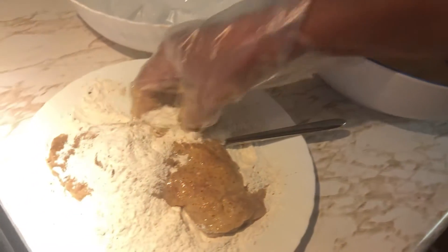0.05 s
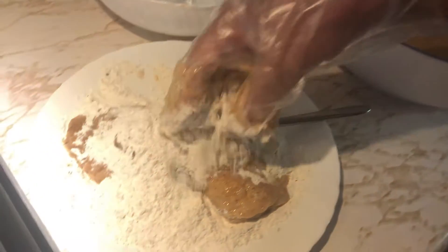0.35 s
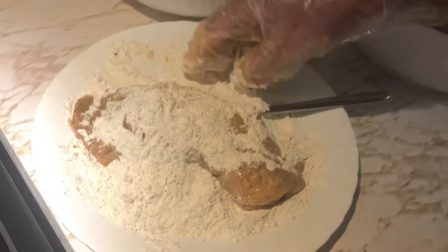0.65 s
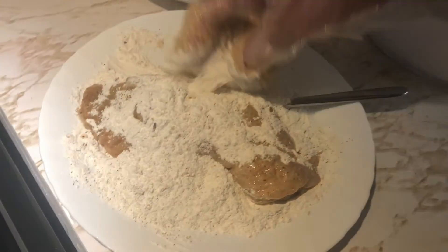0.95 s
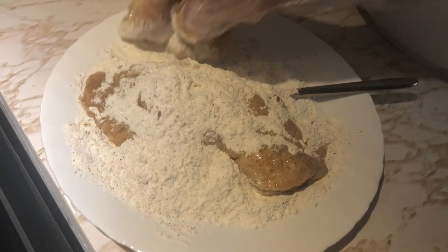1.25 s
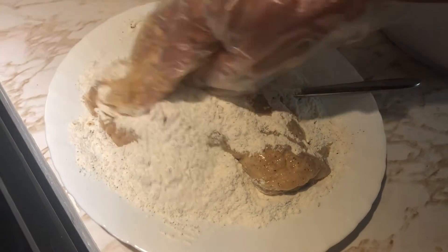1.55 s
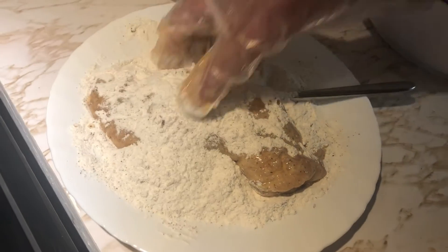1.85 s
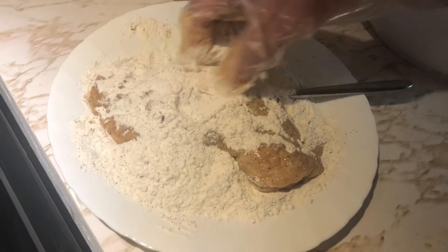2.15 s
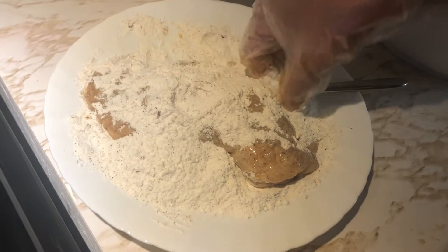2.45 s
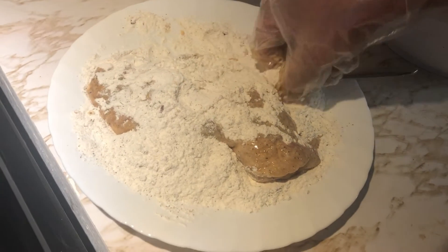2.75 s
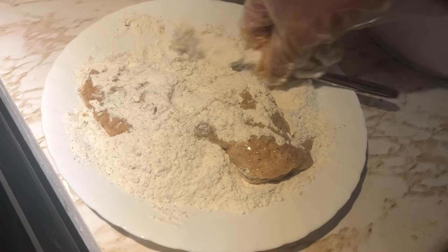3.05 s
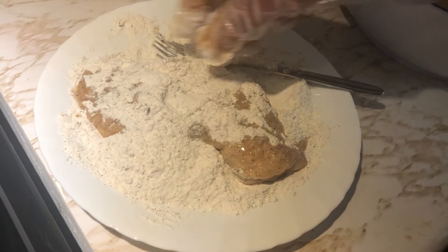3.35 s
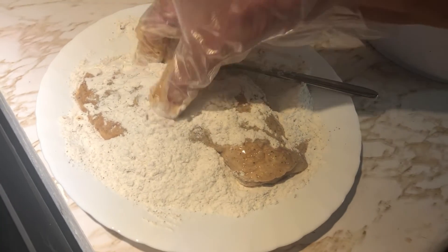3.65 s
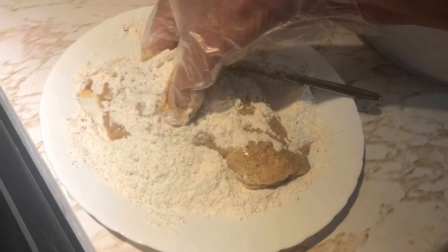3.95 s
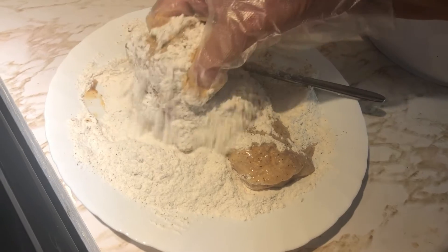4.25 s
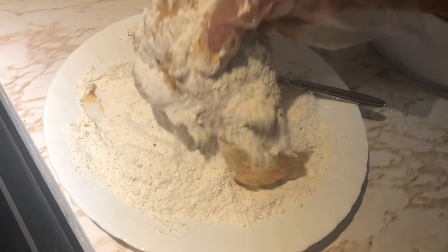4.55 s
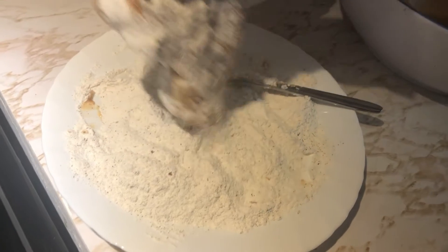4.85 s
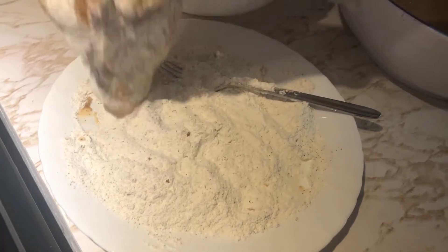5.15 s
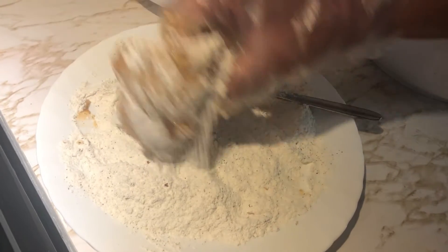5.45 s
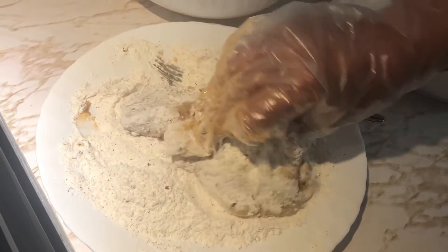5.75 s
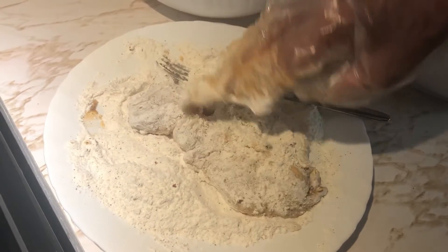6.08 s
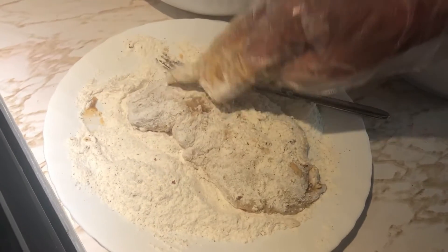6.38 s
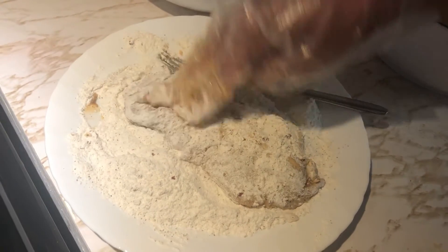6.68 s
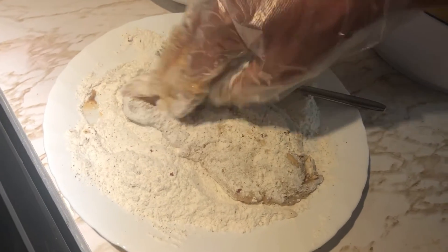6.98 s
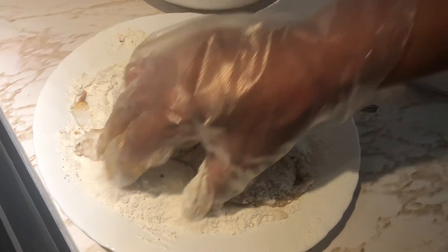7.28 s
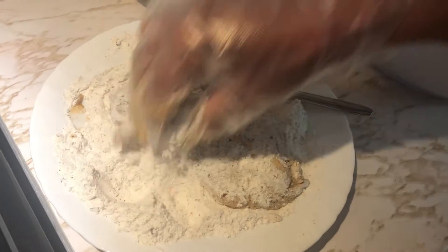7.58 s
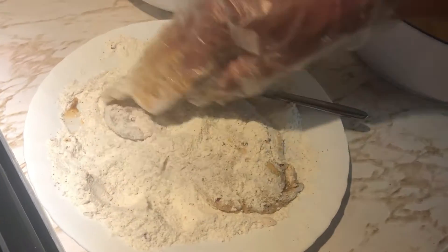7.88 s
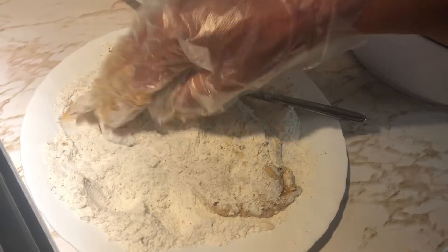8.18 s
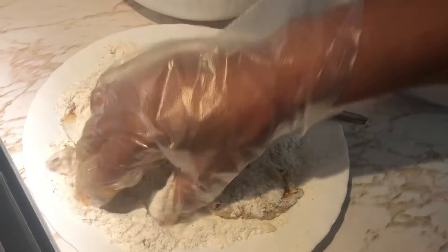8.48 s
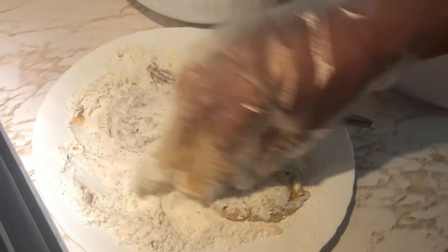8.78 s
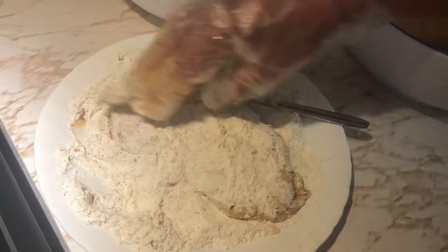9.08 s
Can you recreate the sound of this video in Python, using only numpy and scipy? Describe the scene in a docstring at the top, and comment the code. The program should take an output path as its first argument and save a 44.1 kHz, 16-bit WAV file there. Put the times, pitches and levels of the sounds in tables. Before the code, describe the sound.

Soft, crisp crinkling from a plastic glove comes and goes over the faint hiss of flour rubbed on a plate. A third of the way through, a fork drops against the china with one sharp, ringing clack, by far the loudest sound. The hand keeps working, and wet chicken now and then smacks lightly as it unsticks from the glove. A low appliance hum fills the small kitchen throughout.

```python
"""A hand in a thin plastic glove scoops and presses flour over chicken on a china plate.
The glove crinkles as tiny creases buckle and bigger folds snap. The powder rubs with a soft hiss,
and the wet meat smacks now and then as it lets go of the glove. Once a fork slips on the rim and
clacks down, setting steel and china ringing. An appliance hums in the small, echoing kitchen."""
import sys
import numpy as np
from scipy import signal
from scipy.fft import rfft, irfft, next_fast_len
from scipy.io import wavfile
from scipy.ndimage import uniform_filter1d

SR = 44100
rng = np.random.default_rng(int(sys.argv[2]) if len(sys.argv) > 2 else 0)


def output_pcm(signal):
    """Save a mono or channel-first signal as 16-bit PCM at the path in sys.argv[1].

    Samples are clipped to [-1, 1] before scaling.
    """
    pcm = np.clip(np.atleast_2d(signal).T, -1, 1) * 32767
    wavfile.write(sys.argv[1], SR, np.round(pcm).astype(np.int16))


N = 402191


def from_db(db):
    """Turn decibels into a number to multiply a sound by."""
    return 10 ** (np.asarray(db) / 20)


def rms_one(x):
    """Scale a signal so its average strength (rms) is 1."""
    return x / np.sqrt(np.mean(x ** 2) + 1e-20)


def at_hz(points, hz):
    """Look up a value by pitch, blending between the rows of a table."""
    known_hz, values = np.transpose(points)
    return np.interp(np.log(np.maximum(hz, 1)), np.log(known_hz), values)


def noise(spectrum):
    """Steady noise of strength 1, shaped by rows of pitch_hz, level_db."""
    size = next_fast_len(N)
    gain = from_db(at_hz(spectrum, np.fft.rfftfreq(size, 1 / SR)))
    return rms_one(irfft(rfft(rng.standard_normal(size)) * gain, size)[:N])


def drift(turns_per_s):
    """A random wandering curve of strength 1."""
    place = np.arange(N) / SR * turns_per_s
    return rms_one(np.interp(place, np.arange(N), rng.standard_normal(N)))


def band(x, hz, octaves, order=2):
    """Keep the part of a sound around one pitch."""
    edges = [hz / 2 ** (octaves / 2), min(hz * 2 ** (octaves / 2), .47 * SR)]
    return signal.sosfilt(signal.butter(order, edges, "band", fs=SR, output="sos"), x + 1e-18)


def dying(fade_s):
    """Half a second of times, and a fade that drops 60 dB in fade_s."""
    t = np.arange(SR // 2) / SR
    return t, from_db(-60 * t / fade_s)


def ring(clicks, hz, cycles):
    """Each click rings at one pitch and drops 60 dB in the given number of cycles."""
    decay, angle = from_db(-60 * hz / (cycles * SR)), 2 * np.pi * hz / SR
    return signal.lfilter([1, 0, -1], [1, -2 * decay * np.cos(angle), decay * decay], clicks + 1e-18)


def add(track, start_s, sound):
    """Mix a sound in at a given time."""
    start = max(round(start_s * SR), 0)
    track[start:start + len(sound)] += sound[:N - start]


def room_air():
    """The air in the room makes a faint, low rush."""
    # tone of the air: pitch_hz, relative_db
    air_tone = [(20, -22.5), (42, 5), (80, 0), (115, 8.5), (170, -1), (240, 3), (400, -3), (500, -5),
                (700, -4.5), (1100, -3.5), (2500, -18.5), (6000, -28), (10000, -43.5), (16000, -28.5)]
    return from_db(-55.5) * noise(air_tone)


def appliance_hum(waver_db_per_radian):
    """Motors and mains power hum; the less steady a tone is, the more its level wavers too."""
    # tones of the hum: pitch_hz, level_db, wander_radians
    tones = [(49.8, -66, .3), (57.7, -62, 1.1), (71.3, -64.5, 1.2), (98, -67.5, 0.44), (147.8, -51.5, 0.13),
             (235.5, -69, 1.06), (310, -75, 0.22), (547, -79.5, .4)]
    t, out = np.arange(N) / SR, 0
    for hz, db, wander in tones:
        phase = 2 * np.pi * (hz * t + rng.random()) + wander * drift(4)
        gain = from_db(db + waver_db_per_radian * wander * drift(5))
        out = out + np.sqrt(2) * gain * np.sin(phase)
    return out


def kitchen_echo(x):
    """Reflections off the walls build up in a few milliseconds and die away, the highest ones first."""
    # echo of the kitchen: pitch_hz, fade_s, relative_db
    room = [(150, 0.46, 7.5), (500, 0.46, 1), (1790, 0.4, 3), (4200, 0.49, -3.5), (6500, 0.43, -9),
            (10000, 0.33, -8.5), (15000, 0.35, -3.5)]
    echo, room = 0, np.array(room)
    for hz in 90 * 2 ** np.arange(0, 8, .5):
        t, fade = dying(at_hz(room[:, [0, 1]], hz))
        gain = from_db(at_hz(room[:, [0, 2]], hz))
        echo = echo + gain * fade * band(rng.standard_normal(len(t)), hz, 0.52)
    echo = echo * (1 - np.exp(-t / 0.0054))
    return signal.fftconvolve(x, echo / np.sqrt(np.sum(echo ** 2)))[:N]


def dull_swells():
    """One long, faint swell of mid-pitched rush, among short, dull swells."""
    # swells of noise: middle_s, level_db, pitch_hz, rise_s, width_octaves
    swells = [(0.568, -57, 268, 0.065, 0.84), (1.35, -64.5, 820, .7, 0.86), (1.618, -61.5, 230, .15, 0.45),
              (3.578, -57, 580, 0.034, 0.24), (5.739, -63, 621, .08, 0.36), (5.979, -61.5, 607, 0.15, 0.39)]
    out = np.zeros(N)
    for middle_s, db, hz, rise_s, octaves in swells:
        swell = np.hanning(int(2 * rise_s * SR))
        body = band(rng.standard_normal(N // 2), hz, octaves)[-len(swell):]
        add(out, middle_s - rise_s, from_db(db) * rms_one(body * swell))
    return out


def worktop_thuds():
    """The fork's blow passes into the heavy plate and worktop, which answer with a few slow swings."""
    # low thuds: start_s, level_db, pitch_hz, rise_s
    thuds = [(3.0655, -14, 557, 0.0015), (3.067, -32, 232, .004), (3.077, -33.5, 114.5, 0.0073)]
    out, t = np.zeros(N), np.arange(SR // 2) / SR
    for start_s, db, hz, rise_s in thuds:
        swell = t / rise_s * np.exp(1 - t / rise_s)
        add(out, start_s, from_db(db) * swell * np.sin(2 * np.pi * hz * t))
    return out


def fork_clack(crack_fade_s):
    """Each landing is a hard crack that sets steel and china ringing; later cracks are duller."""
    # the fork lands and bounces twice: start_s, crack_db, tones_db, crack_top_hz
    bounces = [(3.063, -6.5, -2.5, 15000), (3.0802, -9, 0.5, 6500), (3.0963, -15, -18, 5000)]
    # tones of the clack (longer ringing of fork and plate, and brief pitches colouring the crack):
    # pitch_hz, relative_db, fade_s
    clack_tones = [(486, -30, .2), (598, -23.5, .1), (884, -24, .1), (1600, -28, .09), (1830, -30, .13),
                   (1995, -23, .04), (2719, -23, .06), (3550, -21, .06), (4115, -27.5, .19),
                   (4920, -22, .03), (5290, -19, .04), (6060, -12, .055), (6172, -17, .05),
                   (6485, -24, .04), (7130, -18, .065), (8260, -19, .045), (9480, -21, .055),
                   (9526, -16, .07), (10790, -26, .07), (12150, -21, .04)]
    # colour of the hard contact: pitch_hz, relative_db
    crack_colour = [(40, -47), (170, -10), (400, -2), (700, -3), (1150, -7), (1700, -3.5), (3000, -6.5),
                    (4200, -5.5), (5500, -0.5), (8000, -7.5), (11000, -8), (15500, -9)]
    out, contact = np.zeros(N), noise(crack_colour)
    for k, (start_s, crack_db, tones_db, top_hz) in enumerate(bounces):
        t, fade = dying(crack_fade_s)
        crack = from_db(crack_db) * fade * contact[k * len(t):(k + 1) * len(t)]
        add(out, start_s, signal.lfilter(*signal.butter(1, top_hz, fs=SR), crack))
        for hz, db, fade_s in clack_tones:
            t, fade = dying(fade_s)
            tone = np.sin(2 * np.pi * (hz * t + rng.random()))
            add(out, start_s, from_db(tones_db + db) * fade * tone)
    return signal.sosfilt(signal.butter(2, 130, "high", fs=SR, output="sos"), out + 1e-18)


def meat_smacks(spit_db):
    """A small wet pocket opens and rings, with a high spitting sound."""
    # sticky meat lets go of the glove: start_s, peak_db, pitch_hz, fade_s
    smacks = [(3.875, -41, 2023, 0.054), (4.215, -42, 2150, 0.057), (5.135, -35.5, 1905, 0.022),
              (6.29, -42, 2220, .1), (6.43, -41, 2117, 0.047), (6.585, -36, 2250, 0.098),
              (8.2265, -29, 1800, 0.033), (8.599, -31, 3374, .045)]
    out = np.zeros(N)
    for start_s, db, hz, fade_s in smacks:
        t, fade = dying(fade_s)
        tear = fade * rng.standard_normal(len(t))
        pocket = rms_one(band(tear, hz, 0.28))
        spit = from_db(spit_db) * rms_one(band(tear, 8000, 1.8))
        pop = pocket + spit
        add(out, start_s, from_db(db) * pop / np.abs(pop).max())
    return out


def flour_rub(level_db):
    """Powder rubs on china with a soft hiss whose level flickers."""
    # tone of the rubbing: pitch_hz, relative_db
    flour_tone = [(200, -22), (450, -10.5), (650, 5.5), (1000, -4), (1500, 2), (2100, 2), (3000, -1.5),
                  (5000, -2), (12000, -21)]
    return noise(flour_tone) * from_db(level_db - 3.5 + 2.3 * drift(90))


def hand_strokes(grab_s, release_s, idle_glove_db, idle_flour_db):
    """Glove and flour levels in dB over time: each stroke takes hold, swells or eases, and lets go."""
    # each scoop, press or shake: start_s, length_s, glove_db, flour_db, swell_db (start to end)
    strokes = [(0.0, .11, -47.5, -55, -5), (0.171, .2, -55, -55.5, 3.5), (0.51, .61, -58, -57.5, -1),
               (1.16, .135, -47.5, -54, 1), (1.381, .3, -48.5, -54, 5), (1.69, .14, -44, -52, 1),
               (1.86, .115, -47.5, -52.5, 0), (2.01, .15, -58, -57.5, 0), (2.171, .22, -46.5, -55.5, 4),
               (2.424, .17, -45.5, -51.5, 1), (2.62, .42, -56.5, -57, 3), (3.262, .065, -46, -52, -3),
               (3.351, .49, -49, -54, 9), (3.86, .32, -45, -51.5, -5), (4.19, .245, -44.5, -51.5, -6),
               (4.47, .125, -58.5, -61, -1), (4.82, 0.019, -58, -60.5, -0.5),
               (4.89, .035, -50.5, -56.5, -4), (4.98, .19, -49.5, -56.5, -4), (5.189, .33, -53, -60, 3),
               (5.53, .34, -45, -54, 0), (5.881, .13, -41.5, -51.5, 5), (6.03, .22, -44.5, -54.5, 6),
               (6.27, .125, -48.5, -53.5, 0), (6.42, .09, -57, -59, 0), (6.52, .1, -42, -51.5, 5),
               (6.63, .155, -45.5, -56, -6), (6.894, .07, -47.5, -55.5, 3), (6.991, .195, -47.5, -58, 7),
               (7.22, .275, -48, -54.5, 0), (7.511, .15, -55, -63, -4), (7.689, .115, -43.5, -53, 8),
               (7.842, .05, -53.5, -60, 0), (7.979, .13, -48, -54.5, 10), (8.139, .11, -52, -57.5, 0),
               (8.27, .24, -50.5, -63, -6), (8.53, .08, -42.5, -52.5, -6), (8.62, .04, -53.5, -62, -3),
               (8.8, .11, -48.5, -55.5, 0), (8.941, .18, -54, -60, 11)]
    t = np.arange(0, N / SR, .002)
    glove, flour = from_db(idle_glove_db) ** 2, from_db(idle_flour_db) ** 2  # never quite still
    for start_s, length_s, glove_db, flour_db, swell_db in strokes:
        grab = np.clip((t - start_s) / grab_s + .5, 0, 1)
        release = np.clip((start_s + length_s - t) / release_s + 1, 0, 1)
        progress = np.clip((t - start_s) / length_s, 0, 1)
        power = (grab * release * from_db(swell_db * (progress - .5))) ** 2
        glove = glove + from_db(glove_db) ** 2 * power
        flour = flour + from_db(flour_db) ** 2 * power
    return [np.interp(np.arange(N) / SR, t, 10 * np.log10(layer)) for layer in (glove, flour)]


def small_folds(glove_db, per_s, follow, boost_db, spread_db, pitch_hz, spread_octaves):
    """Pick random folds, louder when the glove works harder: rows of start_s, relative_db, pitch_hz."""
    when, strength, pitch = rng.random((int(per_s * N / SR), 3)).T
    average_db = np.mean(glove_db)
    work_db = average_db + follow * (glove_db[(when * N).astype(int)] - average_db)
    db = work_db + boost_db + spread_db * strength ** 2
    hz = pitch_hz * 2 ** (spread_octaves * (2 * pitch - 1))
    return list(zip(when * N / SR, db, hz))


def glove_snaps(small, tick_fade_s, flutter_db, flutter_fade_s, octaves):
    """Each fold, large or small, gives one sharp tick, then the plastic around it flutters briefly."""
    # large folds snapping through: start_s, relative_db, pitch_hz
    large = [(0.6754, -32, 7800), (0.8713, -36, 7950), (0.9862, -36, 8000), (1.1525, -34.5, 7300),
             (1.179, -35, 8100), (1.2003, -30.5, 7700), (1.389, -36, 7400), (1.475, -24, 13500),
             (1.551, -36, 8900), (1.635, -30.5, 7500), (1.7288, -31.5, 8200), (1.8744, -33, 8700),
             (1.9637, -35.5, 8420), (2.0748, -39.5, 5730), (2.5514, -35, 8950), (2.592, -34.5, 7700),
             (4.444, -32.5, 10400), (5.3225, -38.5, 9170), (5.4713, -34.5, 9000), (5.989, -31, 7500),
             (6.165, -27, 7590), (6.226, -32.5, 11150), (6.3565, -35, 8000), (6.61, -26, 8580),
             (7.1577, -30.5, 8800), (7.23, -37, 6330), (7.2887, -32.5, 7000), (8.021, -34, 10500),
             (8.5414, -29.5, 10900)]
    out = np.zeros(N)
    tick, flutter = dying(tick_fade_s)[1], dying(flutter_fade_s)[1]
    fade = (tick + from_db(flutter_db) * flutter)[:SR // 20]
    for start_s, db, hz in large + small:
        snap = band(fade * rng.standard_normal(len(fade)), hz, octaves, order=1)
        add(out, start_s, from_db(db - 17.0) * rms_one(snap))
    return out


def glove_crinkle(level_db, creases_per_s, spread_db, buckles_per_s, buckle_s, cycles, hiss_db):
    """Thin plastic buckles in bursts of tiny creases, each with its own pitch, over a sliding hiss."""
    # tone of the thin plastic: pitch_hz, relative_db
    plastic_tone = [(500, -26), (1500, -17), (3000, -3), (5000, -0.5), (7000, 1.5), (10000, -0.5),
                    (15500, -2.5)]
    effort_db = level_db - np.mean(level_db)
    # the rates hold at average effort; harder work buckles the plastic more often
    buckle_chance = buckles_per_s * from_db(.5 * effort_db) / SR
    buckles = (rng.random(N) < buckle_chance) * rng.uniform(.2, 1, N)
    bursts = signal.lfilter([1], [1, -np.exp(-1 / (buckle_s * SR))], buckles + 1e-18) + .12
    bursts = bursts / uniform_filter1d(bursts, SR // 25)  # keep the average near 1
    crease_chance = creases_per_s * bursts * from_db(.7 * effort_db) / SR
    starts = np.flatnonzero(rng.random(N) < crease_chance)
    sizes = from_db(spread_db * np.minimum(rng.exponential(1, len(starts)), 3.5))
    sizes = sizes * rng.choice([-1, 1], len(starts))
    pitches = np.geomspace(1700, 15500, num=30)
    picked = rng.choice(len(pitches), len(starts), p=pitches / pitches.sum())
    creases = 0
    for k, hz in enumerate(pitches):
        clicks = np.bincount(starts, sizes * (picked == k), N)
        gain = from_db(at_hz(plastic_tone, hz)) * np.sqrt(hz)
        creases = creases + gain * rms_one(ring(clicks, hz, cycles))
    # sparse creases stand out more than crowded ones
    creases = rms_one(creases * from_db(-.35 * effort_db))
    hiss = noise(plastic_tone) * from_db(hiss_db + .2 * effort_db) * np.sqrt(bursts)
    return from_db(level_db - 3.0) * (creases + hiss)


def scene():
    """Mix the working hand, the fork, their echo and the kitchen background."""
    glove_db, flour_db = hand_strokes(grab_s=.036, release_s=.045, idle_glove_db=-66, idle_flour_db=-59.5)
    uneven_grip_db = drift(24)
    crinkle = glove_crinkle(glove_db + uneven_grip_db, creases_per_s=2700, spread_db=4.0,
                            buckles_per_s=160, buckle_s=.0025, cycles=13.5, hiss_db=-6.5)
    folds = small_folds(glove_db, per_s=16, follow=0.53, boost_db=5, spread_db=7,
                        pitch_hz=9308, spread_octaves=0.51)
    snaps = glove_snaps(folds, tick_fade_s=0.0058, flutter_db=-16, flutter_fade_s=0.033, octaves=1.12)
    hand = crinkle + snaps + flour_rub(flour_db) + meat_smacks(spit_db=-0.5)
    swells = dull_swells()
    fork = fork_clack(crack_fade_s=0.034) + worktop_thuds()
    echo = kitchen_echo(from_db(-13.5) * (hand + swells) + from_db(-14.0) * fork)
    background = room_air() + appliance_hum(waver_db_per_radian=2.0)
    return (hand + swells + fork + echo + background)[None]


def record(dry):
    """Round off the loudest peaks and cut the very highest pitches."""
    ceiling, cutoff_hz = 1.02, 16000
    rounded = ceiling * np.tanh(dry / ceiling)
    return signal.sosfilt(signal.ellip(12, .1, 80, cutoff_hz, fs=SR, output="sos"), rounded)


dry = scene()
out = record(dry)
output_pcm(out)
```